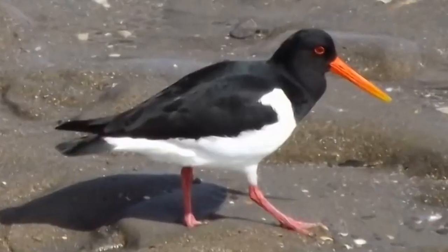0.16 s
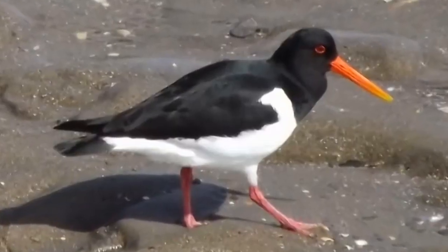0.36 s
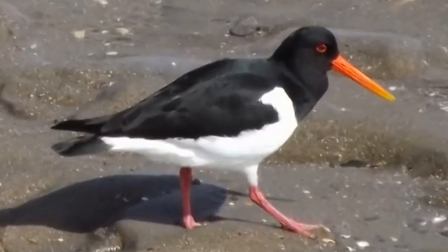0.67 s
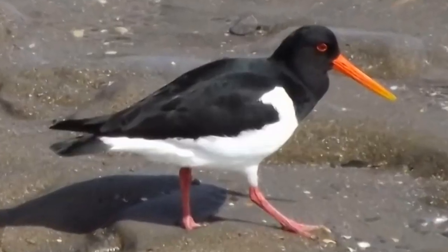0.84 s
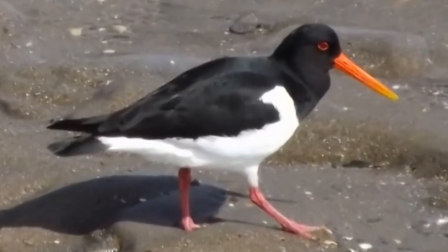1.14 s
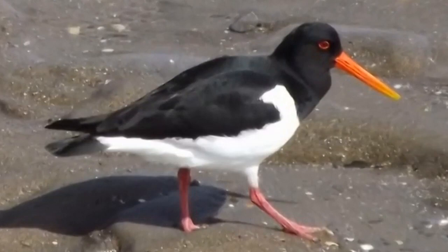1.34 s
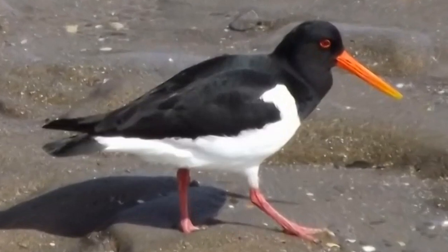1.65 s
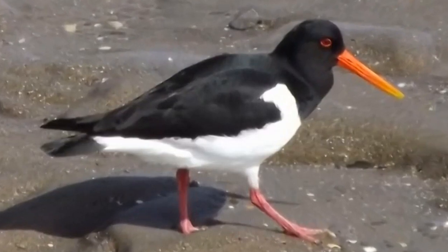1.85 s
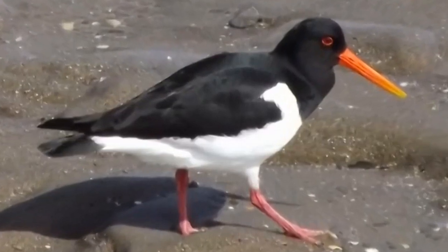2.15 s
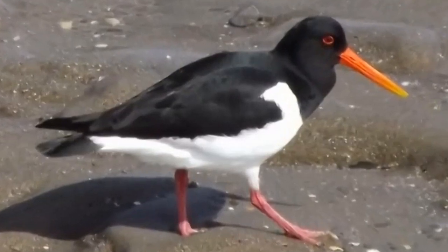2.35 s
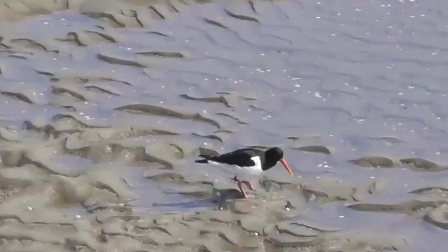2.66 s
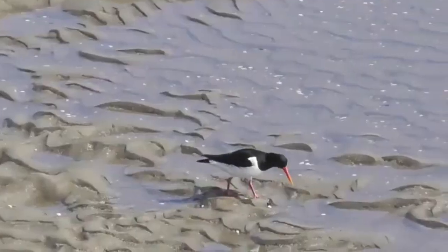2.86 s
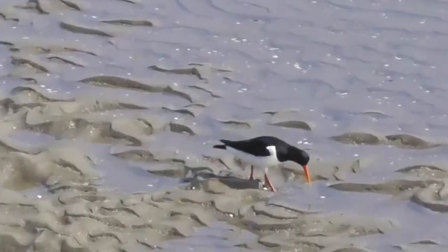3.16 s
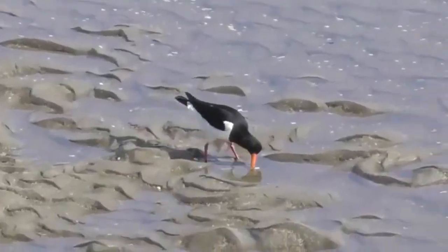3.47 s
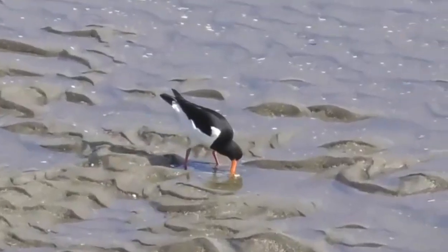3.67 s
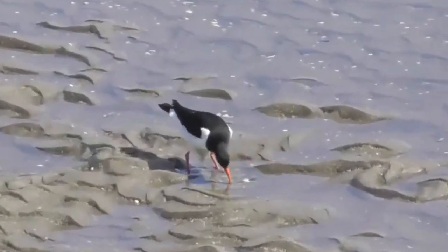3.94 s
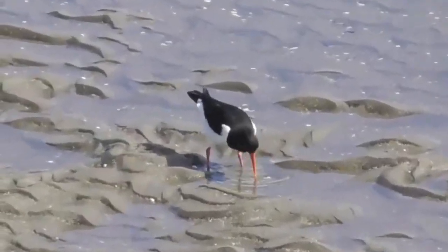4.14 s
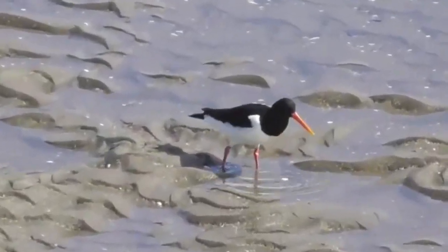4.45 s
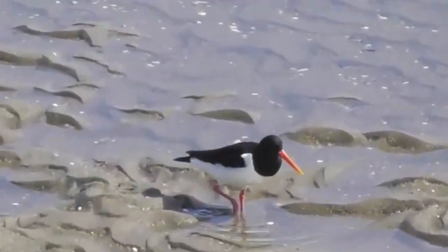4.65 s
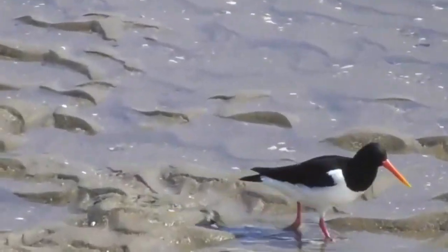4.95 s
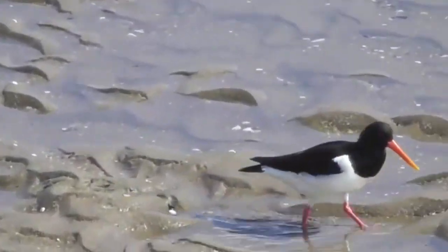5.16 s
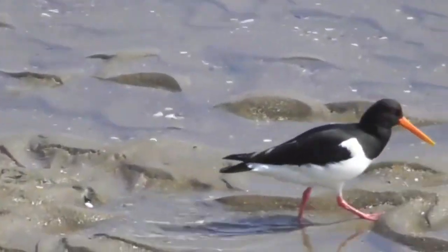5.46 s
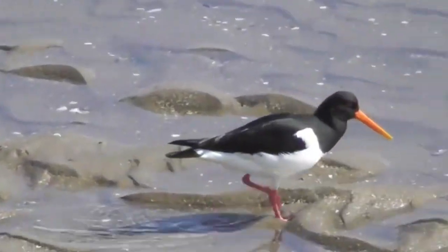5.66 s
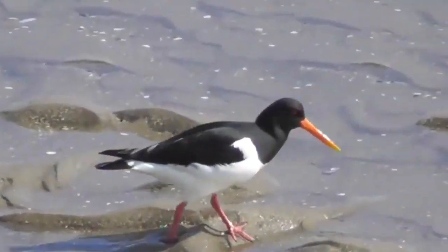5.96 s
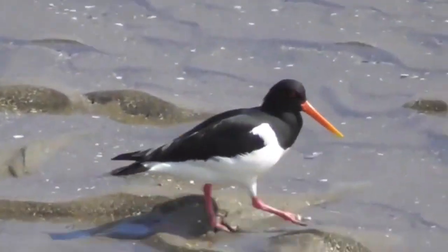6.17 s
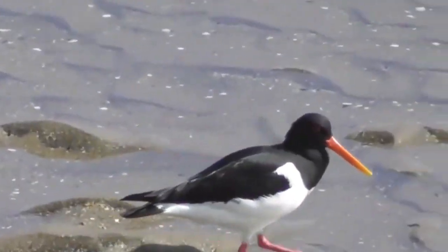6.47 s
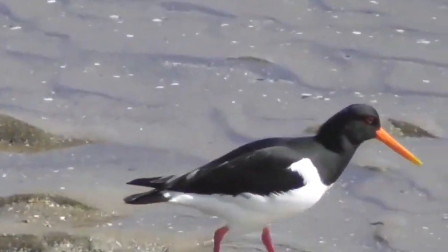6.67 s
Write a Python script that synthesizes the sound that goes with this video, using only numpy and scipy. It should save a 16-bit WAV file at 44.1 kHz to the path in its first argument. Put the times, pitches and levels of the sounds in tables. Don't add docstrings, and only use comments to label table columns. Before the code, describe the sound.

On a windy mud flat, an oystercatcher close to the microphone gives brief, clear, arched pipes at uneven intervals, under a second apart or longer. A small bird adds faint falling peeps and a second bird answers with higher pips. Low wind gusts thump the microphone for the first three seconds, then ease, leaving distant shore wash, more pipes and soft far-off whistles.

```python
import sys
import numpy as np
from scipy import signal
from scipy.fft import rfft, irfft
from scipy.io import wavfile
from scipy.ndimage import uniform_filter1d, minimum_filter1d

SR = 44100
rng = np.random.default_rng(int(sys.argv[2]) if len(sys.argv) > 2 else 0)


def convert_level_to_amplitude(level_db):
    exponent = np.asarray(level_db, float) / 20
    return 10 ** exponent


def transcribe(signal):
    frames = np.atleast_2d(signal).T
    limited = np.clip(frames, -1, 1)
    pcm = np.round(limited * 32767).astype(np.int16)
    wavfile.write(sys.argv[1], SR, pcm)


N = 300321

# (crest_s, level_db, build_s to rise by 20 dB, eddy_pitch_hz)
GUSTS = [(0.0721, -16.4, 0.09, 442), (0.3199, -18.5, .06, 300), (0.445, -24.5, .07, 248),
         (0.5326, -26, .04, 174), (0.6901, -19.5, 0.03, 432), (0.806, -26.5, 0, 200),
         (1.2746, -26.5, 0.04, 450), (1.3634, -22, .04, 248), (1.5103, -16.5, 0.0157, 264),
         (1.5436, -16.5, 0.04, 499), (1.675, -31.5, 0.1, 110), (1.7817, -23, .03, 386),
         (1.8758, -23, .06, 178), (1.9305, -25, 0.03, 300), (2.2815, -33.5, 0.03, 257),
         (2.358, -32.5, 0.09, 247), (2.504, -33, 0, 350), (2.682, -23, 0.01, 350),
         (2.7834, -16.5, 0.01, 200), (2.8635, -25, 0.07, 180), (2.9597, -22, 0.0444, 328),
         (3.1382, -18, .035, 490), (3.2833, -31, 0.01, 179), (3.375, -35, 0.07, 130),
         (3.6503, -35.5, .06, 254), (4.2445, -31.5, 0.0446, 240), (5.1907, -38.5, .08, 248),
         (5.9008, -32, 0.05, 357), (6.1226, -28.5, 0.05, 410), (6.4903, -31, 0.06, 262)]
# (middle_s, peak_db, pitch_hz)
EDDIES = [(0.0038, -28, 179), (0.0307, -23, 248), (0.0532, -21.5, 344), (0.0892, -16.5, 296),
          (0.129, -29, 244), (0.2235, -27.5, 213), (0.245, -27, 436), (0.304, -21.5, 298),
          (0.3334, -18.5, 577), (0.3859, -28.5, 357), (0.4689, -26.5, 149), (0.6462, -26, 182),
          (0.7107, -25, 154), (0.733, -25, 255), (0.752, -25, 352), (1.1492, -38, 237), (1.423, -30, 210),
          (1.4846, -23.5, 209), (1.5348, -15, 177), (1.5576, -17, 300), (1.8546, -30, 246),
          (2.1527, -37, 213), (2.6556, -27, 298), (2.8139, -19.5, 255), (2.9353, -29.5, 249),
          (3.1128, -25, 200), (3.5982, -35.5, 175), (5.5305, -36.5, 150), (5.8773, -30.5, 300),
          (6.5456, -41.5, 255)]


def evened(x):
    return x / np.sqrt(np.mean(x ** 2) + 1e-20)


def read(points, hz):
    f, value = np.transpose(points)
    return np.interp(np.log(hz + 1), np.log(f + 1), value)


def add(mix, s, sound):
    part = mix[max(round(s * SR), 0):][:len(sound)]
    part += sound[:len(part)]


def along(table, at):
    s, *columns = np.transpose(table)
    return [uniform_filter1d(np.interp(at, s, c), size=30, mode="nearest") for c in columns]


def soft(sound):
    return sound * signal.windows.tukey(len(sound), 50 / len(sound))


def band_noise(lo_hz, hi_hz, order):
    sos = signal.butter(order, [lo_hz, hi_hz], "bandpass", fs=SR, output="sos")
    return evened(signal.sosfilt(sos, rng.standard_normal(N)))


def blowing():
    # (time_s, level_db)
    breeze = [(0, -39), (.81, -39), (.87, -53), (1.02, -56), (1.15, -43.5), (1.9, -47), (2.05, -62),
              (2.42, -42), (2.58, -66), (2.9, -43), (3.3, -54), (3.9, -61.5), (4.35, -58), (5.38, -66),
              (5.5, -47.5), (5.75, -56.5), (6.5, -52), (6.7, -73)]
    stir_s, stir_db = 0.029, -4
    let_go = 0.73
    t = np.arange(0, N, 32) / SR
    power = convert_level_to_amplitude(2 * np.interp(t, *np.transpose(breeze)))
    swells = [(s, db, build_s) for s, db, build_s, hz in GUSTS]
    swells += [(s, db, stir_s) for s, db, hz in EDDIES]
    for s, db, build_s in swells:
        below_db = 20 * np.maximum(s - t, (t - s) / let_go) / build_s if build_s else None
        if below_db is None:
            with np.errstate(divide="ignore", invalid="ignore"):
                below_db = 20 * np.maximum(s - t, (t - s) / let_go) / np.float64(build_s)
        power = power + convert_level_to_amplitude(2 * (db + stir_db - below_db))
    return np.interp(np.arange(N) / SR, t, 10 * np.log10(power))


def wind(gust_db):
    deep_db = -41 + 0.64 * (uniform_filter1d(gust_db, size=900) + 30.5)
    lumps = uniform_filter1d(uniform_filter1d(rng.standard_normal(N), size=450), size=450)
    lumps = np.tanh(evened(lumps) / 1.37) * 1.4
    body = convert_level_to_amplitude(gust_db - 8 + 5.0 * lumps) * band_noise(91, 304, order=2)
    edge = convert_level_to_amplitude(-62.0 + 1.94 * (gust_db + 31.5) + 11.0 * lumps) * band_noise(444, 623, order=2)
    rumble = convert_level_to_amplitude(deep_db + 2.1) * band_noise(47.6, 119.6, order=2)
    return body + edge + rumble


def eddies(gust_db):
    small_per_s, small_db, low_hz, high_hz = 14, 7, 114, 278
    out = np.zeros(N)
    strikes = [(s, db, hz) for s, db, build_s, hz in GUSTS] + EDDIES
    for when, height in rng.random((150, 2))[:round(small_per_s * N / SR)]:
        db = min(gust_db[int(when * N)] + small_db, -30)
        strikes.append((when * N / SR, db, low_hz * (high_hz / low_hz) ** height))
    for (s, db, hz), (phase, spread, snap) in zip(strikes, rng.random((len(strikes), 3))):
        cycles = np.arange(-2 / hz, 2 / hz, 1 / SR) * hz
        push = np.exp(-(cycles / (0.33 + 0.25 * spread)) ** 2 / 2) * np.cos(2 * np.pi * (cycles + phase))
        flick = np.exp(-(cycles / 0.092) ** 2 / 2) * np.cos(2 * np.pi * (1.1 * cycles + snap))
        add(out, s - 2 / hz, convert_level_to_amplitude(db + 3.0) * (push + convert_level_to_amplitude(-6.5) * flick))
    return out


def opened(t):
    # (from_s, to_s)
    spans = [(.375, 0.53), (2.75, 4.62), (4.77, 5.5), (5.72, 6.64)]
    return sum(np.clip(np.minimum(t - a, b - t) / .02, 0, 1) for a, b in spans)


def shore():
    # (pitch_hz, level_db per Hz)
    wash = [(18, -35), (30, -10), (77, -8), (291, -9.5), (822, -3.5), (1810, -7), (3360, -17), (4300, -26),
            (5110, -27.5), (5790, -30.5), (6390, -29), (7410, -31), (11000, -48), (14300, -79),
            (22000, -120)]
    # (time_s, level_db)
    surge = [(0.0, -50), (0.28, -50), (0.89, -51.5), (1.42, -50), (1.93, -51), (2.37, -50), (3.05, -51.5),
             (4.36, -50.5), (4.84, -53), (5.25, -54.5), (6.81, -53)]
    # (middle_s, rise_db, width_s)
    breakers = [
        (1.1, 1.1, .2),
        (2.05, 1.4, .2),
        (3.87, 3.5, 0.18),
    ]
    frames, hz = N // 256 + 5, np.fft.rfftfreq(1024, 1 / SR)
    a, b, patches = rng.standard_normal((frames, 513, 3)).T
    patches = evened(uniform_filter1d(uniform_filter1d(patches, size=10, axis=0), size=12, axis=1))
    t = np.arange(frames) * 256 / SR
    high = np.clip((hz[:, None] - 2500) / 3000, 0, 1)
    surge_db = np.interp(t, *np.transpose(surge))
    spray_db = -73 + 0.49 * (surge_db + 51) - 1.5 * opened(t)
    for s, db, width in breakers:
        spray_db = spray_db + db * np.exp(-((t - s) / width) ** 2 / 2)
    swell_db = (1 - high) * surge_db + high * (spray_db + 24)
    z = (a + 1j * b) * convert_level_to_amplitude(read(wash, hz)[:, None] + 0.72 * patches)
    still = signal.istft(z, nperseg=1024, noverlap=768)[1][:N]
    return signal.istft(z * convert_level_to_amplitude(swell_db + 3.0), nperseg=1024, noverlap=768)[1][:N] / still.std()


def hiss():
    shut_db, open_db = -90, -83
    hiss_db = shut_db + (open_db - shut_db) * opened(np.arange(N) / SR)
    return convert_level_to_amplitude(hiss_db) * band_noise(8800, 15000, order=3)


def arched(share, rise, rise_power, fall, last_drop, snap_at, snap_width, snap):
    away = abs(2 * share - 1)
    up = rise * away ** rise_power + snap * np.clip((snap_at - share) / snap_width, 0, 1)
    down = fall * away ** 2 + last_drop * away ** 6
    return uniform_filter1d(1 - np.where(share < .5, up, down), size=30, mode="nearest")


def pipe(arch, effort, note, partials_db):
    # (pitch_hz, level_db)
    throat = [(1700, -3), (4500, 3), (5050, 4), (5400, 0), (5900, -7), (6800, -8), (7700, 0), (8800, 0),
              (9250, -12), (9900, -3), (10800, 0), (11750, 5), (12500, -24), (13450, -10)]
    start, crest, end, top_hz, db = note
    share = np.interp(np.arange(start, end, 1 / SR), [start, crest, end], [0, .5, 1])
    sag = 1.6 * max(crest - start - .034, 0)
    dip = sag * np.sin(np.pi * np.clip(share / .45, 0, 1)) ** 2
    hz = top_hz * (arched(share, **arch) - dip)
    effort_db = along(effort, share)[0]
    turn = 2 * np.pi * np.cumsum(hz) / SR
    source_db = [0, *partials_db, partials_db[-1] - 14]
    lean = [1.0, .85, 1.6, 1.6, 1.2, 1.0]
    voice = 0
    for k in range(6):
        partial_hz = (k + 1) * hz
        loud = convert_level_to_amplitude(db + source_db[k] + lean[k] * effort_db + read(throat, partial_hz))
        below_top = np.clip((15800 - partial_hz) / 600, 0, 1)
        voice = voice + loud * below_top * np.cos((k + 1) * turn - 1.6 * k)
    return soft(voice)


def near_piper():
    # (start_s, crest_s, end_s, top_pitch_hz, level_db)
    pipes = [
        (0.1297, .165, .1995, 2725, -24),
        (0.7607, .7945, .827, 2706, -22),
        (1.496, 1.527, 1.560, 2703, -24.5),
        (2.048, 2.082, 2.1165, 2705, -22.5),
        (2.645, 2.683, 2.720, 2727, -21.5),
        (3.3, 3.337, 3.373, 2706, -28),
        (4.607, 4.640, 4.675, 2697, -23.5),
        (5.576, 5.624, 5.6625, 2697, -23.5),
        (6.2778, 6.316, 6.352, 2683, -26.5),
        (6.8035, 6.838, 6.873, 2700, -27.5),
    ]
    # (second_db, third_db, fourth_db, fifth_db)
    pipe_partials = [(-7.5, -2.5, -14, -35), (-7.5, -4.5, -17, -39), (-8.5, -6, -15.5, -37),
                     (-9, -5.5, -16.5, -36), (-10, -9.5, -22, -43), (-6.5, -1.5, -17, -30),
                     (-5, -8, -31, -37.5), (-6.5, -4, -15.5, -26), (-8, -3.5, -13.5, -27),
                     (-11.5, -13, -13, -43)]
    pipe_arch = dict(rise=0.16, rise_power=1.6, fall=.2, last_drop=0.183, snap_at=0.045, snap_width=0.021, snap=0.235)
    # (share, level_db)
    pipe_effort = [(0, -27), (.03, -13), (.045, -4.5), (.08, -5.5), (.3, -1.05), (.5, 0), (.75, -1.4),
                   (.89, -7), (1, -21.5)]
    out = np.zeros(N)
    for note, weights in zip(pipes, pipe_partials):
        add(out, note[0], pipe(pipe_arch, pipe_effort, note, weights))
    return out


def peep(length, top_hz, depth, db, octave_db):
    peep_slide = [(0, .09), (.1, .008), (.18, 0), (.28, .008), (.5, .056), (.72, .106), (.86, .12),
                  (1, .128)]
    # (share, level_db)
    peep_effort = [(0, -24), (.1, -12), (.18, -1.5), (.3, 3), (.5, 1.8), (.76, -3.5), (.9, -11), (1, -20)]
    share = np.arange(0, length, 1 / SR) / length
    hz = top_hz * (1 - depth * along(peep_slide, share)[0])
    turn = 2 * np.pi * np.cumsum(hz) / SR
    overtones = np.sin(2 * turn) + convert_level_to_amplitude(-17) * np.sin(3 * turn)
    return soft(convert_level_to_amplitude(db + along(peep_effort, share)[0]) * (np.sin(turn) + convert_level_to_amplitude(octave_db) * overtones))


def small_bird():
    # (start_s, top_pitch_hz, depth of the slide as a factor, level_db, octave_db)
    peeps = [
        (.414, 5050, 0.91, -37.5, -48),
        (1.413, 4960, .93, -42.5, -33),
        (2.098, 5080, 1.1, -44.5, -46),
        (3.139, 4876, 0.77, -45.5, -26),
        (3.921, 5170, 1.1, -47.5, -21),
        (5.169, 4960, 0.99, -43, -27),
        (5.983, 5280, 1.36, -38, -38),
        (6.742, 4990, 0.83, -44.5, -36),
    ]
    out = np.zeros(N)
    for s, *note in peeps:
        add(out, s, peep(0.056, *note))
    return out


def second_bird():
    # (start_s, crest_s, end_s, top_pitch_hz, level_db)
    pips = [
        (.698, 0.724, .751, 2930, -31.5),
        (1.750, 1.775, 1.804, 2920, -30.5),
        (3.248, 3.277, 3.303, 2880, -36.5),
        (6.092, 6.113, 6.135, 3050, -52),
        (4.166, 4.192, 4.24, 2530, -50),
    ]
    # (second_db, third_db, fourth_db, fifth_db)
    pip_partials = [(-13, -13.5, -28, -55), (-14.5, -17, -22, -24), (-8, -13.5, -18.5, -45),
                    (-22, -24, -36, -45), (-28, -30, -40, -50)]
    pip_arch = dict(rise=.2, rise_power=1.65, fall=.3, last_drop=.03, snap_at=.06, snap_width=0.057, snap=.14)
    # (share, level_db)
    pip_effort = [(0, -25), (.06, -10), (.17, -3.5), (.3, -1.8), (.45, -1), (.63, -1), (.76, -3.5),
                  (.86, -7.5), (1, -16)]
    # (start_s, crest_s, end_s, top_pitch_hz, level_db)
    yelps = [
        (2.426, 2.451, 2.478, 3064, -41.5),
        (4.434, 4.460, 4.482, 2850, -60.5),
    ]
    # (second_db, third_db, fourth_db, fifth_db)
    yelp_partials = [(-9, -16, -27, -38), (0, -14, -12, -20)]
    yelp_arch = dict(rise=.2, rise_power=1.88, fall=0.265, last_drop=.06, snap_at=.28, snap_width=.045, snap=.105)
    out = np.zeros(N)
    for calls, partials, arch in [(pips, pip_partials, pip_arch), (yelps, yelp_partials, yelp_arch)]:
        for note, weights in zip(calls, partials):
            add(out, note[0], pipe(arch, pip_effort, note, weights))
    return out


def far_wader():
    # (crest_s, level_db)
    whistles = [
        (4.615, -49.5),
        (5.121, -49.5),
        (5.532, -51.5),
        (6.017, -53),
        (6.487, -51.5),
    ]
    # (time_s from the crest, pitch_hz, level_db)
    whistle = [(-.135, 2050, -16), (-.115, 2130, -7), (-.045, 2430, -3), (-.035, 2560, 0),
               (-.018, 2520, -2), (0, 2610, 0), (.008, 2430, -3), (.035, 2200, -5), (.05, 1950, -16)]
    first_s, last_s = whistle[0][0], whistle[-1][0]
    hz, swell_db = along(whistle, np.arange(first_s, last_s, 1 / SR))
    tone = np.sin(2 * np.pi * np.cumsum(hz) / SR)
    out = np.zeros(N)
    for s, db in whistles:
        shimmer_db = 2.5 * evened(uniform_filter1d(rng.standard_normal(len(hz)), size=500))
        add(out, s + first_s, soft(convert_level_to_amplitude(db + swell_db + shimmer_db) * tone))
    return out


def chip(length, start_hz, end_hz, db):
    turn = 2 * np.pi * np.cumsum(np.linspace(start_hz, end_hz, round(length * SR))) / SR
    octave_db = 1.5 if end_hz < start_hz else -22
    return convert_level_to_amplitude(db) * np.hanning(len(turn)) ** .5 * (np.sin(turn) + convert_level_to_amplitude(octave_db) * np.sin(2 * turn))


def chips():
    # (start_s, length_s, start_hz, end_hz, level_db)
    chip_notes = [
        (6.011, .016, 3850, 3500, -56),
        (6.800, .006, 2950, 3450, -45),
    ]
    out = np.zeros(N)
    for s, *note in chip_notes:
        add(out, s, chip(*note))
    return out


def masked(x):
    masked_db, from_hz = -49, 5600
    hz, t, z = signal.stft(x, SR, nperseg=1024)
    near = uniform_filter1d(abs(z), size=9, axis=1)
    loudest = -minimum_filter1d(-abs(z), size=101, axis=1)
    keep = (near > convert_level_to_amplitude(masked_db) * loudest) | (hz[:, None] < from_hz)
    return signal.istft(z * keep, SR, nperseg=1024)[1][:, :N]


def filled(x):
    # (middle_s, low_hz, high_hz)
    cells = [(.434, 4650, 5200), (1.228, 6900, 8250), (1.262, 4650, 6250), (1.632, 5170, 6890),
             (2.679, 7600, 8400), (2.942, 6890, 8270), (3.678, 5700, 6890), (4.05, 5170, 7550),
             (5.152, 5170, 6330), (6.508, 6330, 7550)]
    hz, t, z = signal.stft(x, SR, nperseg=1024)
    for s, lo, hi in cells:
        cell = np.ix_([0, 1], (hz > lo) & (hz < hi), abs(t - s) < .025 / 2)
        loud = np.sqrt(abs(uniform_filter1d(abs(z[cell]) ** 2, size=9, axis=1)))
        z[cell] = 1.4 * loud * np.exp(2j * np.pi * rng.random(z[cell].shape))
    return signal.istft(z, SR, nperseg=1024)[1][:, :N]


def scene():
    gust_db = blowing()
    air = wind(gust_db) + eddies(gust_db) + shore() + hiss()
    birds = near_piper() + small_bird() + second_bird() + far_wader() + chips()
    return np.tile(air + birds, (2, 1))


def top_cut(x):
    return signal.sosfilt(signal.butter(12, 15700, fs=SR, output="sos"), x)


def record(dry):
    # (pitch_hz, width_hz, level_db)
    notches = [
        (5780, 260, -10),
        (6900, 150, -4),
    ]
    hz = np.fft.rfftfreq(N, 1 / SR)
    colour_db = sum(db / (1 + (2 * (hz - f) / width) ** 2) for f, width, db in notches)
    housed = irfft(rfft(dry) * convert_level_to_amplitude(colour_db), N)
    mix = filled(masked(housed))
    return top_cut(mix)


dry = scene()
out = record(dry)
transcribe(out)
```